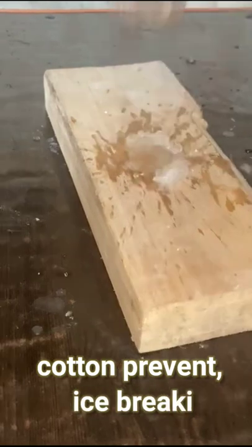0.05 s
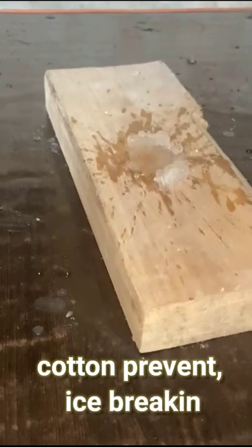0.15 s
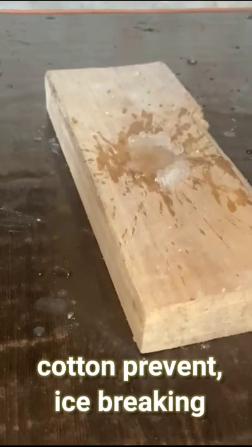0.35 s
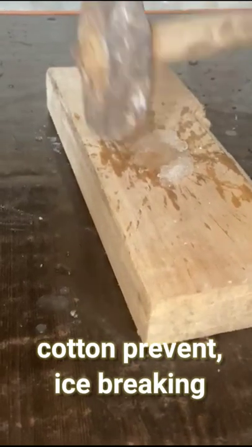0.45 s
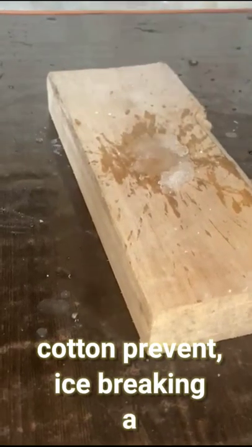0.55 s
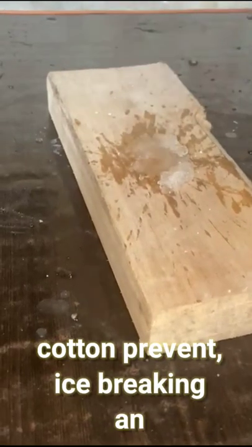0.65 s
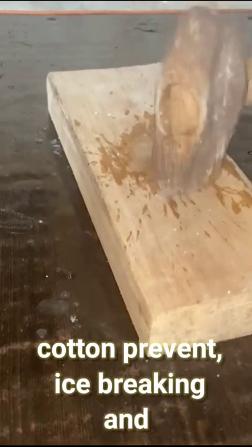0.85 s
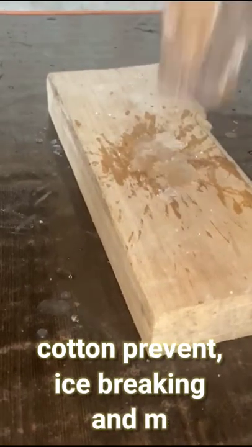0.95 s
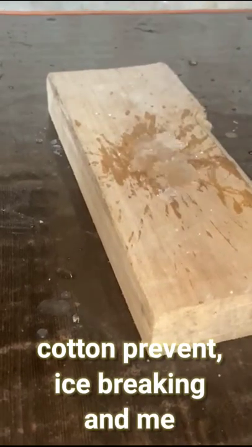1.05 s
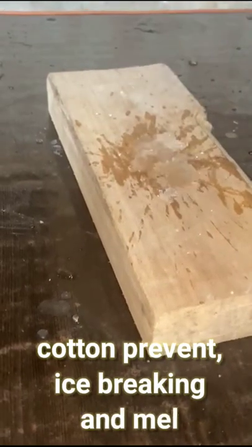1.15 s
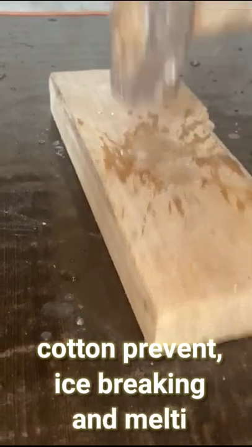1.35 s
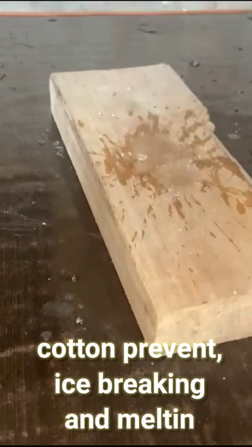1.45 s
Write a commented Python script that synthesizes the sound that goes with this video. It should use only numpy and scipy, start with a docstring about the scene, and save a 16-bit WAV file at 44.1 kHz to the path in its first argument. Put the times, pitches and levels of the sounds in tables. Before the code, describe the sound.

Three hammer blows crack ice on a wooden board, which bounces and clacks after each.

```python
"""A faint rumble and a soft bump, then three hammer blows on a lump of ice on a loose wooden plank,
close to a two-port microphone in a reverberant room. Each blow cracks the ice with a few glassy snaps,
bends the plank with a falling knock, thumps the table under it and crushes ice into grains.
The plank jumps and clacks back down, and the room rings on behind it."""
import sys
import numpy as np
from scipy import signal
from scipy.fft import rfft, irfft
from scipy.io import wavfile

SR = 44100
rng = np.random.default_rng(int(sys.argv[2]) if len(sys.argv) > 2 else 0)


def dump_mix(stems):
    """Bounce the given channels to the path in sys.argv[1] as a 16-bit WAV at rate SR."""
    frames = np.atleast_2d(stems).T  # one column per channel
    limited = np.clip(frames, -1, 1)  # hard clip at full scale
    pcm = np.round(limited * 32767).astype(np.int16)
    wavfile.write(sys.argv[1], SR, pcm)


N = 66150


def amp(db):
    """Decibels to gain."""
    return 10 ** (np.asarray(db) / 20)


def read(points, hz, column=1):
    """One column of a table, on a log-frequency axis."""
    table = np.transpose(points)
    return np.interp(np.log(hz + 1), np.log(table[0] + 1), table[column])


def add(mix, s, sound):
    """Mixes a sound in at s seconds."""
    part = mix[..., max(round(s * SR), 0):]
    part += sound[..., :part.shape[-1]]


def clock():
    """Seconds since an event began."""
    return np.arange(N) / SR


def colour(x, spectrum):
    """Gives x a spectrum, at rms 1."""
    y = irfft(rfft(x) * amp(read(spectrum, np.fft.rfftfreq(N, 1 / SR))), N)
    return y / np.sqrt(np.mean(y ** 2))


def wander(seconds):
    """A smooth random drift of rms 1 that changes over the given time."""
    hz = np.fft.rfftfreq(N, 1 / SR)
    y = irfft(rfft(rng.standard_normal(N)) * np.exp(-(hz * seconds) ** 2), N)
    return y / np.std(y)


def burst(rise_s, fall_s):
    """Straight attack, exponential release."""
    t = clock()
    return np.minimum(t / rise_s, 1) * np.exp(-np.maximum(t - rise_s, 0) / fall_s)


# Each row: frequency in Hz, relative noise density in dB.
RUMBLE_SPECTRUM = [(10, -32), (24, -3), (45, -9), (60, -2.5), (113, -12.5), (300, -39.5), (12000, -77)]
def rumble():
    """Faint, steady low noise in the room, the same at both ports."""
    return amp(-50) * colour(rng.standard_normal(N), RUMBLE_SPECTRUM)


# Each row: frequency in Hz, relative noise density in dB.
BUMP_SPECTRUM = [(60, -13), (380, -5), (650, -29.5), (8000, -56.5)]
def bump(start_s=0.158):
    """A soft low bump with a thin tick on it, just before the first blow."""
    out = np.zeros((2, N))
    add(out, start_s, amp(-39) * burst(0.00067, 0.059) * colour(rng.standard_normal(N), BUMP_SPECTRUM))
    add(out, start_s, amp(-59) * crack(0.00045))
    return out


def grains(spectrum, per_s=9000, spread_db=3, clump_db=2, side_db=-14):
    """Clumps of tiny fractures of uneven size, a little different at each port."""
    size_db = spread_db * np.minimum(rng.exponential(1, (2, N)), 4)
    size_db += clump_db * np.clip(wander(0.0015), -2, 2)
    sign = rng.choice([-1, 1], (2, N))
    breaks = rng.random((2, N)) < per_s / SR
    mid, side = colour(amp(size_db) * sign * breaks, spectrum)
    return mid + amp(side_db) * np.array([side, -side])


# Each row: frequency in Hz, relative noise density in dB.
CRACK_SPECTRUM = [(1000, 6), (2500, -5.5), (3800, -6.5), (4900, -1.5), (6500, -5.5), (9000, -2),
                  (11000, -6), (12500, -2)]
def crack(seconds):
    """A bright, brief spray of fractures."""
    return burst(seconds, seconds) * grains(CRACK_SPECTRUM)


def flex(hz, glide, rise_s, glide_s, shape):
    """Bending wood: the fast, high waves arrive first, so the pitch falls from hz * (1 + glide) to hz."""
    t = clock()
    turns = hz * (t + glide * glide_s * (1 - np.exp(-t / glide_s)))
    swell = (t / rise_s * np.exp(1 - t / rise_s)) ** shape
    return swell * np.sin(2 * np.pi * turns)


# Each row: start in seconds; crack level in dB and rise in seconds; knock delay in seconds, level in dB,
# final pitch in Hz and glide as a ratio; thump delay in seconds, level in dB and final pitch in Hz;
# crunch delay in seconds and level in dB; gains of clatter, ring and boom in dB.
BLOWS = [(0.1977, -15.5, 0.0023, 0.0013, -2.5, 325.5, 1.76, 0.0057, -12, 69.4, 0.0081, -22.5, -18.5, -0.5, 0.5),
         (0.6868, -19, 0.0032, .004, -1.5, 342, 1.49, .0100, -12.5, 73.6, 0.011, -17, -14, -2, -2.5),
         (1.1217, -13.5, 0.0041, .0052, -2, 236, 4.22, 0.01113, -9.5, 63.5, .0100, -22, -13, -7, -6)]
def hammer(s, crack_db, crack_s, knock_s, knock_db, knock_hz, glide, thump_s, thump_db, thump_hz,
           crunch_s, crunch_db, clatter_db, ring_db, boom_db):
    """One blow through ice, plank and table, close by; returns the impact and what rings on."""
    impact, ringing = np.zeros((2, N)), np.zeros(N)
    knock = flex(knock_hz, glide, rise_s=0.0035, glide_s=0.0017, shape=2.05)
    add(impact, s, amp(crack_db) * crack(crack_s))
    add(impact, s + knock_s, amp(knock_db) * knock)
    add(impact, s + thump_s, -amp(thump_db) * thump(thump_hz, rise_s=0.0077))
    add(impact, s + crunch_s, amp(crunch_db) * crunch(rise_s=0.0026, fall_s=0.02))
    add(impact, s + knock_s, amp(clatter_db) * clatter(rise_s=0.0077, fall_s=0.036))
    add(ringing, s + knock_s, amp(ring_db) * struck_ring())
    add(ringing, s + knock_s, amp(boom_db) * boom())
    return impact, ringing


# Each row: frequency in Hz, relative noise density in dB.
WOOD_SPECTRUM = [(40, -25.5), (120, 0.5), (190, -7.5), (260, 4), (400, -1), (650, 6.5), (930, -2.5),
                 (1150, -8.5), (1480, -9.5), (1750, -18.5), (3000, -19.5), (8000, -57)]
def clatter(rise_s, fall_s):
    """The loose plank rattles in a burst of woody noise."""
    return burst(rise_s, fall_s) * colour(rng.standard_normal(N), WOOD_SPECTRUM)


def ring(modes, waver=0, waver_s=0.051):
    """Dying sines of random phase; waver makes them drift as crowded resonances do."""
    t, out = clock(), np.zeros(N)
    for hz, db, t60 in modes:
        tone = np.exp(2j * np.pi * (hz * t + rng.random()))
        if waver:
            tone *= 1 + waver * (wander(waver_s) + 1j * wander(waver_s))
        out += amp(db - 60 * t / t60) * tone.real
    return out


# Each row: pitch in Hz, relative level in dB, t60 in seconds before the cap at longest_s.
STRUCK_MODES = [(379, -22, 0.21), (914, -19, 0.23), (952, -13, 0.13), (1361, -29, 0.25), (2167, -31, 0.32),
                (2820, -40.5, 0.35), (3645, -36, 0.35), (4750, -33.5, 0.062)]
def struck_ring(longest_s=0.3):
    """Plank and hammer head ring after the blow."""
    return ring([(hz, db, min(t60, longest_s)) for hz, db, t60 in STRUCK_MODES])


# Each row: pitch in Hz, relative level in dB, t60 in seconds.
BOOM_MODES = [(59.2, -33.5, 0.88), (107.9, -37, 3.1), (140.3, -32, 2.9), (164, -36.5, 1.3),
              (230, -35.5, 1.2), (256.5, -20.5, 0.82), (330.3, -26.5, 1.03), (384.2, -28, 0.98)]
def boom(rise_s=0.017):
    """Low resonances of table and room swell and waver as they die."""
    return np.minimum(clock() / rise_s, 1) * ring(BOOM_MODES, waver=0.31)


# Each row: start in seconds, level in dB, pitch in Hz, fall time in seconds.
SNAPS = [(0.1999, -16, 2350, 0.001), (.2105, -21, 3570, 0.0037), (.6892, -24.5, 3730, 0.0023),
         (0.7042, -19.5, 4810, 0.0055), (0.7495, -17, 2810, 0.0019), (1.1269, -26.5, 4690, 0.0077),
         (1.137, -20, 3030, 0.0026)]
def snaps(blow_s, within_s=0.3, rise_s=0.00029):
    """The ice splits after one blow: each split is a sharp tick with a brief glassy ring."""
    out = np.zeros((2, N))
    for s, db, hz, fall_s in SNAPS:
        if 0 < s - blow_s < within_s:
            tone = burst(rise_s, fall_s) * np.sin(2 * np.pi * hz * clock())
            tick = amp(-5) * crunch(rise_s, fall_s=0.0009)
            add(out, s, amp(db) * (tone + tick))
    return out


# Each row: frequency in Hz, relative noise density in dB.
CRUNCH_SPECTRUM = [(300, 4.5), (1000, 3.5), (1800, 0), (2800, 3), (4000, -3), (4900, 0), (6300, -8.5),
                   (8000, -10), (10800, -6.5), (12500, -33)]
def crunch(rise_s, fall_s):
    """Ice crushed into grains."""
    return burst(rise_s, fall_s) * grains(CRUNCH_SPECTRUM)


def thump(hz, rise_s):
    """The table bends under the plank for a few low cycles."""
    return flex(hz, glide=0.8, rise_s=rise_s, glide_s=0.0083, shape=1.5)


# Each row: frequency in Hz, relative level in dB, base t60 in seconds.
ROOM_TAIL = [(50, -36.5, 1.2), (136, -2.5, 1.6), (210, -8, 0.79), (307, -7, 0.89), (710, -13, 0.6),
             (1400, -16.5, 0.55), (2050, -11.5, 0.6), (4800, -13.5, 0.45), (10000, -16, 0.43)]
# Each row: frequency in Hz, side level against mid in dB.
ROOM_WIDTH = [(100, -27.5), (1000, -13.5), (5000, -22), (10000, -12.5)]
# Each row, one to a blow: gain of the tail in dB, factor on its t60.
ROOM_SHARES = [(0.5, 1.323), (1.5, 0.88), (-0.5, 0.91)]
def room(near, blow_index, delay_s=0.0066, build_s=0.0081):
    """The room answers the close sounds with a diffuse tail whose bass outlasts its treble."""
    gain_db, linger = ROOM_SHARES[blow_index]
    hz, t, bands = signal.stft(rng.standard_normal((2, N)), SR, nperseg=512)
    t60 = linger * read(ROOM_TAIL, hz, column=2)[:, None]
    bands *= amp(read(ROOM_TAIL, hz)[:, None] - 60 * t / t60)
    bands *= np.sqrt(2 * np.log(1000) / (t60 * SR))  # a longer decay adds no energy
    bands[1] *= amp(read(ROOM_WIDTH, hz))[:, None]
    onset = np.clip((clock() - delay_s) / build_s, 0, 1)
    tail = signal.istft(bands, SR, nperseg=512)[1][:, :N] * onset
    mid, side = signal.fftconvolve(near.mean(0)[None], tail, axes=1)[:, :N]
    return amp(gain_db) * (mid + np.array([side, -side]))


# Each row: start in seconds, clack level in dB, final pitch in Hz, clatter and grit levels in dB.
BOUNCES = [(.2445, -12, 332, -33, -37), (.271, -16, 603, -17.5, -37), (.2850, -5, 546, -12, -31.5),
           (.321, -15.5, 487, -21.5, -48.5), (.736, -10.5, 318, -18, -43), (.7532, -6, 566, -10.5, -30),
           (.801, -16, 330, -26, -40), (1.1570, -8, 457, -27, -37.5), (1.176, -15.5, 660, -14.5, -34),
           (1.1875, -2, 559, -11, -38.5), (1.2200, -16, 650, -26.5, -49)]
# Each row: pitch in Hz, relative level in dB, t60 in seconds.
EDGE_MODES = [(890, -8.5, 0.049), (1399, -9, 0.045), (2126, -20.5, 0.043)]
# Each row: frequency in Hz, relative noise density in dB.
GRIT_SPECTRUM = [(2500, -1.5), (5200, -3), (9000, -21.5)]
def plank(blow_s, within_s=0.3, rise_s=0.00067, second_edge_s=0.00438):
    """The plank bounces on the table after one blow: double clacks with clatter and icy grit."""
    out = np.zeros((2, N))
    for s, db, hz, clatter_db, grit_db in BOUNCES:
        if 0 < s - blow_s < within_s:
            clack = amp(db) * flex(hz, glide=1.263, rise_s=0.0013, glide_s=0.0015, shape=1.82)
            edge = amp(1.56 * db) * ring(EDGE_MODES)  # soft landings ring the edge less
            add(out, s, clack + edge)
            add(out, s + second_edge_s, amp(-18.5) * clack)  # it lands askew, one edge after the other
            add(out, s, amp(clatter_db) * clatter(rise_s, fall_s=0.013))
            add(out, s, amp(grit_db) * burst(rise_s, fall_s=0.018) * grains(GRIT_SPECTRUM))
    return out


def shudder(start_s=1.187):
    """The table sways once more under the heaviest landing."""
    out = np.zeros(N)
    add(out, start_s, amp(-28.5) * thump(hz=62.2, rise_s=0.022))
    return out


def scene():
    """Blows and bounces up close, with the room and its rumble behind them."""
    out = bump() + rumble() + shudder()
    for index, blow in enumerate(BLOWS):
        impact, ringing = hammer(*blow)
        near = impact + snaps(blow[0]) + plank(blow[0])
        out += near + ringing + room(near, index)
    return out


# Each row: frequency in Hz, phase in radians by which the left port leads; it fades out below treble_hz.
PORT_PHASE = [(3000, .08), (4500, 0.22), (5600, 0.21), (6500, 2.6), (8700, 4.36), (9600, 8.1), (11500, 5.6)]
def record(dry, treble_hz=2500, left_db=-0.12, cutoff_hz=12000):
    """The microphone: its two ports differ in treble phase, peaks round off and the top is cut."""
    hz = np.fft.rfftfreq(2 * N, 1 / SR)
    lead = read(PORT_PHASE, hz) * np.minimum(hz / treble_hz, 1) ** 2
    right = irfft(rfft(dry[1], 2 * N) * np.exp(-1j * lead))[:N]
    ports = np.array([amp(left_db) * dry[0], right])
    rounded = ports / (1 + ports ** 4) ** (1 / 4)
    lowpass = signal.firwin(151, cutoff_hz, window=("kaiser", 9), fs=SR)
    return signal.oaconvolve(rounded, lowpass[None], "same")


dry = scene()
out = record(dry)
dump_mix(out)
```